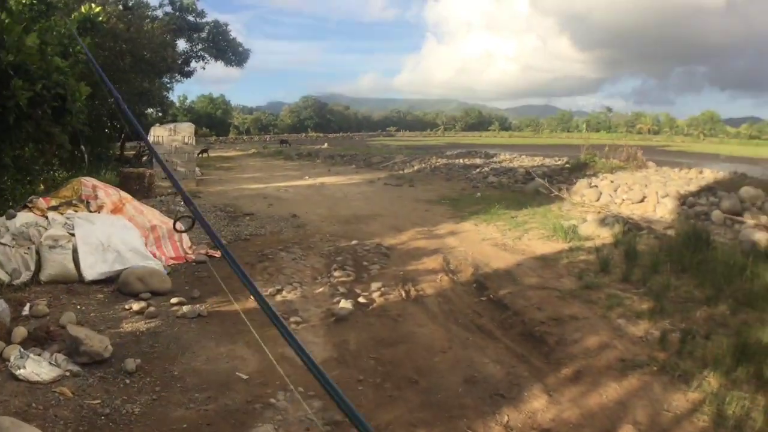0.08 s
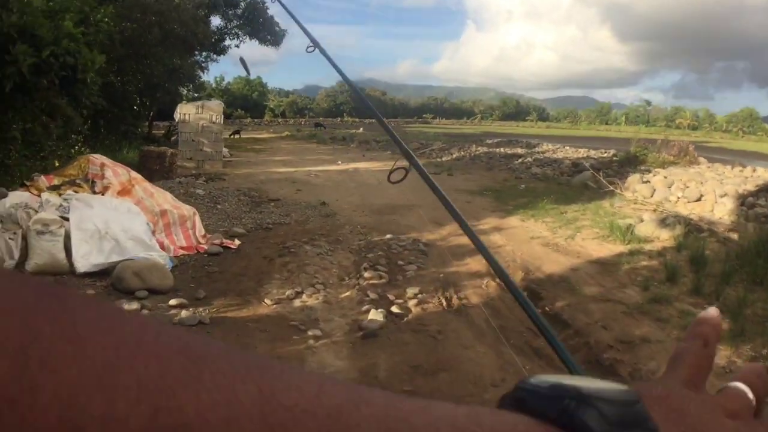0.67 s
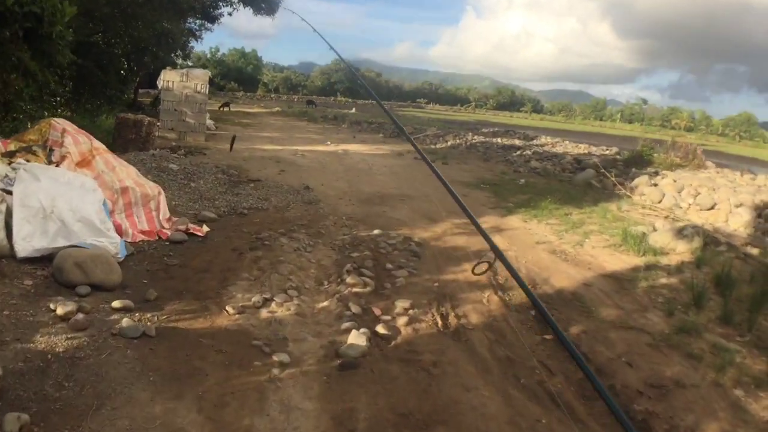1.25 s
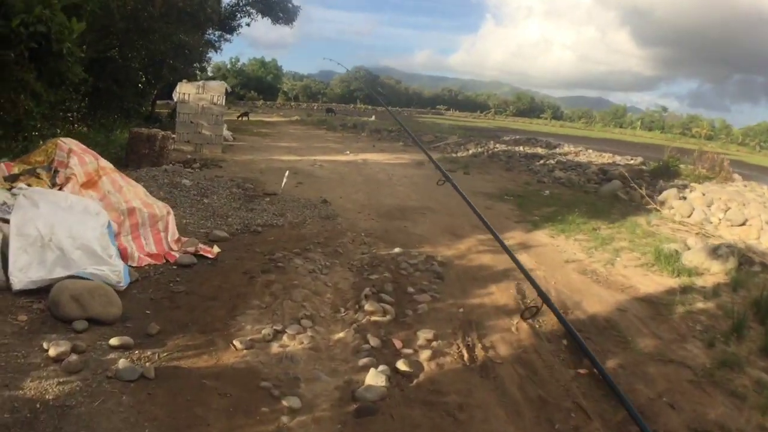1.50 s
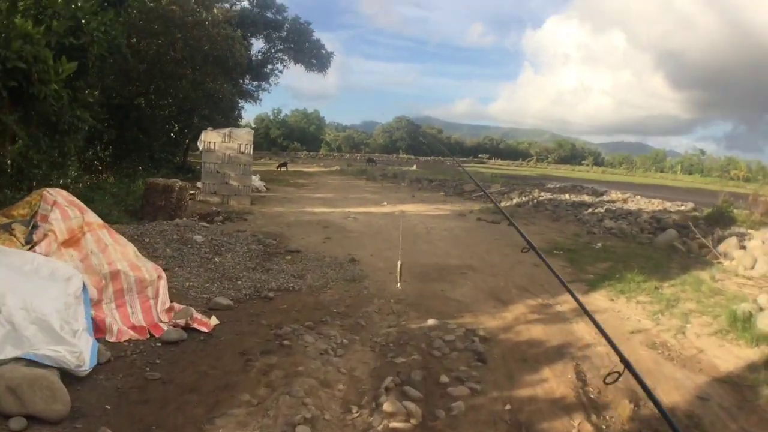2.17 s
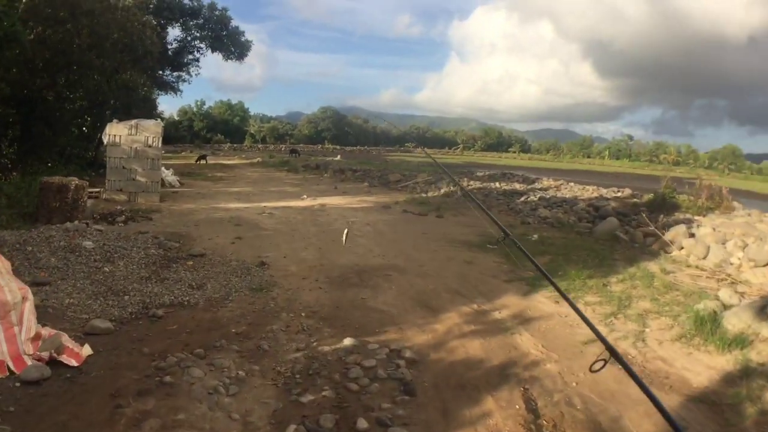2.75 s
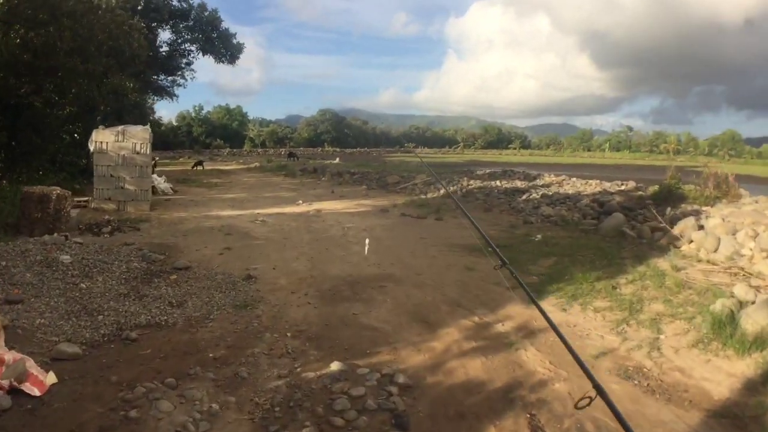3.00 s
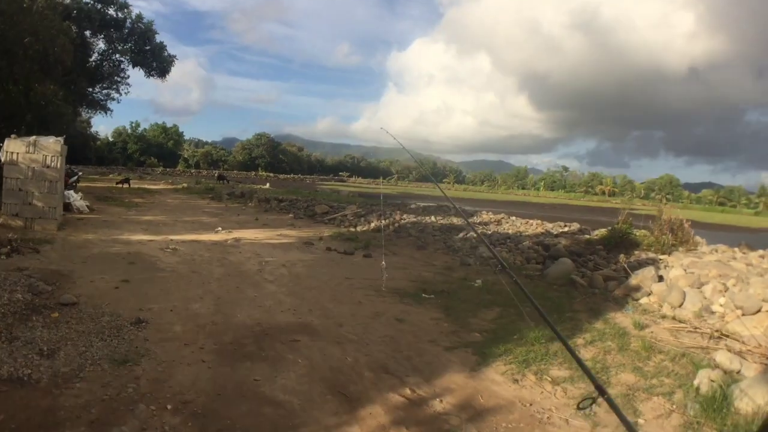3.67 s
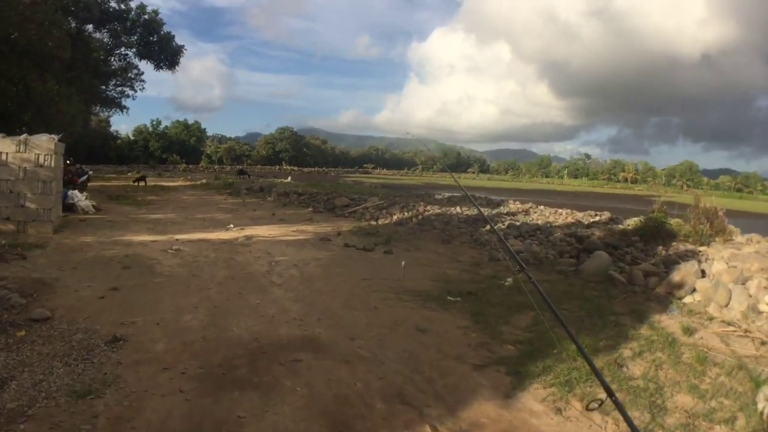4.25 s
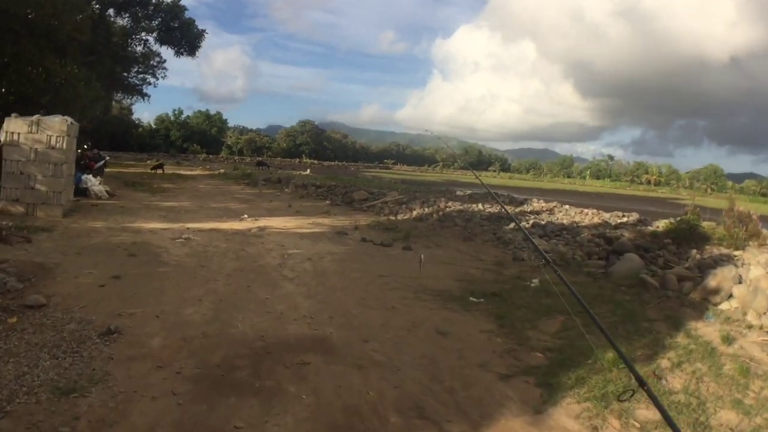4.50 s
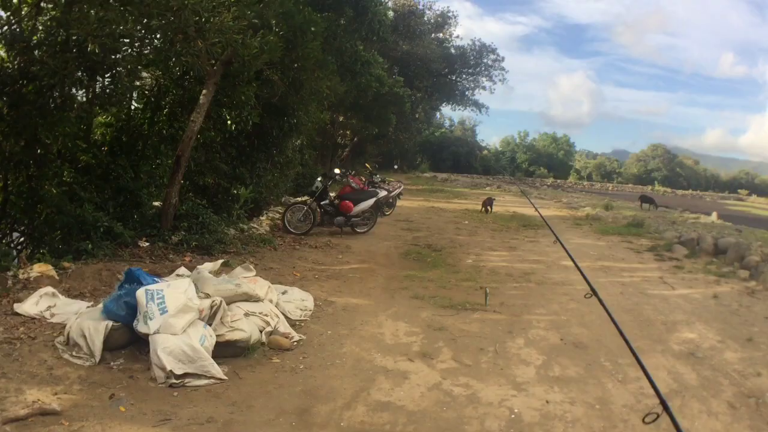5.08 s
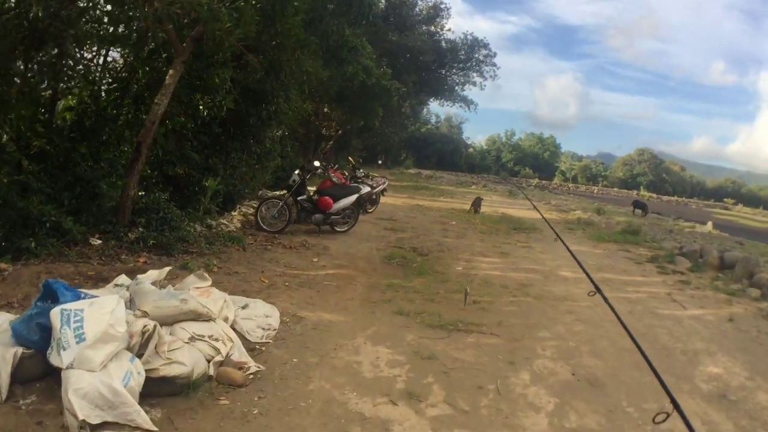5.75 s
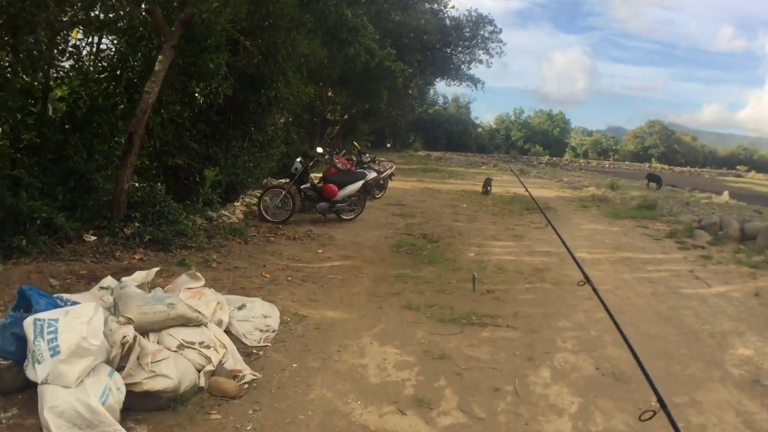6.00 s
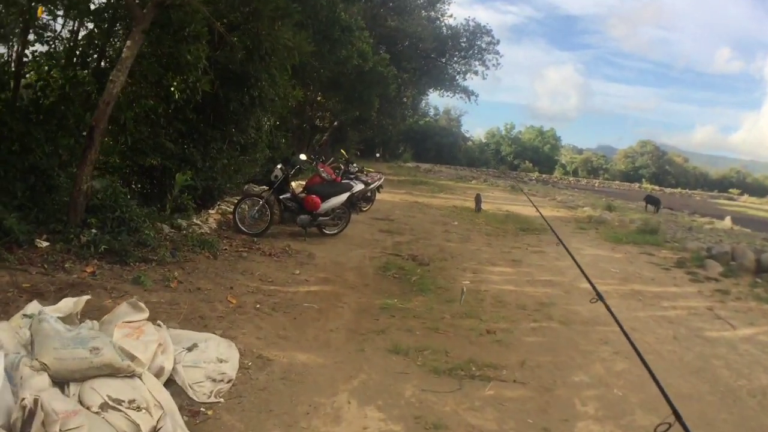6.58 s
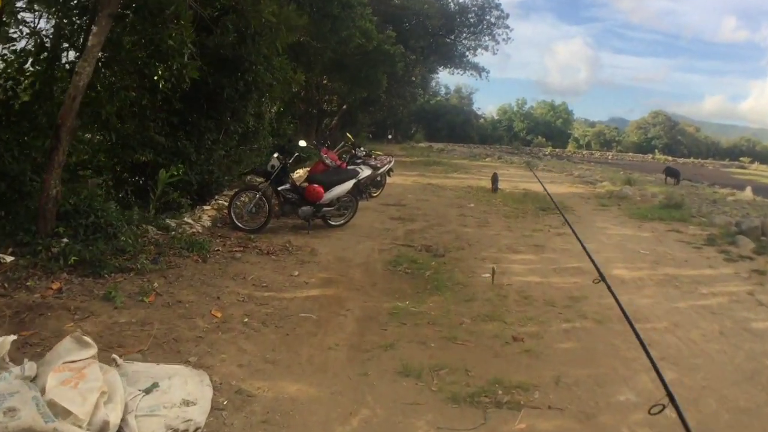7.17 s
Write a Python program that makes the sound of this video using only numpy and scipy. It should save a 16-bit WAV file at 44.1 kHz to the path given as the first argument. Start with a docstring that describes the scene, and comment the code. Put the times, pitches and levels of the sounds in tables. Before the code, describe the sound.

Cloth scrapes and rumbles right on the microphone as gear and fingers knock loudly against its case, during a walk outdoors.

```python
"""Walking with rod and camera

Someone walks a dirt path with a fishing rod, a small camera held against the body. Each stride jolts
it: cloth grabs, holds and lets go as it scrapes the case, and gear and fingers knock on it, so close
to the microphone inside that the input overloads. Behind this lie quiet open air, a faint insect
in the grass and a thin whistle far off."""
import sys
import numpy as np
from scipy import signal
from scipy.fft import rfft, irfft
from scipy.io import wavfile
from scipy.ndimage import uniform_filter1d

SR = 44100
rng = np.random.default_rng(int(sys.argv[2]) if len(sys.argv) > 2 else 0)


def pcm_store(signal):
    """Save signal as 16-bit PCM."""
    levels = np.round(np.clip(np.atleast_2d(signal), -1, 1) * 32767)
    wavfile.write(sys.argv[1], SR, levels.astype(np.int16).T)


N = 324135


def amp(db):
    """Decibels to gain."""
    return 10 ** (np.asarray(db) / 20)


def unit_rms(x):
    """Scales to rms 1."""
    return x / np.sqrt(np.mean(x ** 2) + 1e-20)


def curve_db(points, hz):
    """Reads a spectrum on a log-frequency axis."""
    point_hz, db = np.transpose(points)
    return np.interp(np.log(hz + 1), np.log(point_hz), db)


def add(mix, start_s, sound):
    """Adds a sound to the mix in place."""
    part = mix[max(round(start_s * SR), 0):][:len(sound)]
    part += sound[:len(part)]


def below(hz, corner_hz, order=4):
    """Gain of a smooth low-pass; swapping the two frequencies makes it a high-pass."""
    return 1 / np.sqrt(1 + (hz / corner_hz) ** (2 * order))


def minimum_phase(gain):
    """Spectrum with this gain curve that starts sharply and rings after."""
    cepstrum = irfft(np.log(gain + 1e-9))
    half = len(cepstrum) // 2
    cepstrum[1:half] *= 2
    cepstrum[half + 1:] = 0
    return np.exp(rfft(cepstrum))


def flutter(size=1000):
    """Random wandering of rms 1, smoothed over size samples."""
    return unit_rms(signal.oaconvolve(rng.standard_normal(N), np.hanning(size), "same"))


def swell(middle_s, length_s):
    """A bell-shaped rise and fall."""
    return np.exp(-(2 * (np.arange(N) / SR - middle_s) / length_s) ** 2)


# The air all around the path, with microphone hiss. Each row: frequency in Hz, relative level in dB.
AIR_SPECTRUM = [(20, -5), (60, 4), (200, -6), (600, -11), (1200, -15), (2300, -29), (3500, -28),
                (6000, -33.5), (10000, -37.5), (15000, -42)]


def air(level_db=-54):
    """Steady quiet wash of the open valley."""
    hz = np.fft.rfftfreq(N, 1 / SR)
    wash = irfft(rfft(rng.standard_normal(N)) * amp(curve_db(AIR_SPECTRUM, hz)), N)
    return amp(level_db) * unit_rms(wash)


# Modes of the case around the microphone. Each row: frequency in Hz, width in Hz, level in dB.
CASE_MODES = [(82, 39.7, -5.5), (121.3, 36, -3), (161.3, 29.4, -0.5), (307, 163, -10.5), (604, 62.8, -1.5),
              (736, 87, -2.5), (1110, 40, -15.5), (1911, 47, -16), (2289, 108, -10), (2723, 110, -18),
              (3250, 80, -15.5), (4460, 250, -33), (5500, 160, -19.5), (7100, 1400, -33),
              (12200, 1500, -42.5)]


def case_gain(hz, mode_db=0, detune=1, bass_cut_hz=45):
    """A scrape or knock reaches the microphone through the case modes; mode_db favours some."""
    mode_hz, width_hz, db = np.transpose(CASE_MODES)[:, :, None]
    off_resonance = (hz ** 2 - (mode_hz * detune) ** 2) / (hz * width_hz)
    power = amp(db + mode_db) ** 2 / (1 + off_resonance ** 2)
    return np.sqrt(power.sum(0)) * below(bass_cut_hz, hz, order=2)


def slips(per_s=4500, uneven_db=3, clump_db=2.0):
    """Tiny stick-slip snaps of uneven size that come in clumps."""
    sizes = rng.standard_normal(N) * amp(uneven_db * np.minimum(rng.exponential(1, N), 4))
    snaps = rng.random(N) < per_s / SR
    return snaps * sizes * amp(clump_db * flutter(size=400))


# Strokes of cloth right on the camera. Each row: time of full contact in seconds, hold in seconds,
# pressure in dB, then rumble and grit as offsets from it in dB.
CLOTH_STROKES = [(.01, 0.14, -41, 4.5, -15.5), (.26, .07, -36, 7, -16), (.39, 0.051, -38, 11, -12.5),
                 (.49, .03, -42, 5, -13.5), (.59, 0.091, -40.5, 9.5, -11), (.76, 0.18, -40.5, 14.5, -10),
                 (.93, .08, -30.5, 16, -11.5), (1.099, 0.13, -44, 2, -10.5),
                 (1.283, 0.07, -34.5, 10, -10.5), (1.466, 0.039, -28.5, 7, -16),
                 (1.662, 0.024, -31.5, 9, -13.5), (1.742, 0.043, -25, -1, -16.5),
                 (1.83, 0.029, -30, 7, -12.5), (1.91, 0.03, -29, 4, -13.5), (1.971, .1, -21.5, 9.5, -9.5),
                 (2.099, 0.072, -17.5, 3, -15), (2.199, 0.031, -32, 15, -8.5),
                 (2.348, 0.022, -29.5, 6.5, -10.5), (2.42, 0.068, -40, 15.5, -10.5),
                 (2.593, 0.064, -20.5, -1, -13), (2.69, 0.068, -28.5, 3, -14),
                 (2.8, 0.061, -34.5, 8.5, -15.5), (2.92, 0.1, -38.5, 7, -15), (3.045, 0.022, -26, 3, -15.5),
                 (3.146, 0.046, -28.5, 5, -13.5), (3.273, 0.069, -30, 4, -14),
                 (3.43, 0.018, -42.5, 3.5, -19), (3.52, 0.038, -37, 3, -14), (3.628, 0.04, -22.5, -2, -11),
                 (3.716, 0.051, -26, -1, -11), (3.801, 0.07, -32.5, 6.5, -8.5),
                 (3.985, 0.013, -30.5, 8, -14), (4.074, 0.026, -26.5, 6.5, -13),
                 (4.151, 0.18, -32, -2.5, -13.5), (4.268, 0.07, -30.5, 5, -6.5),
                 (4.44, .22, -36, -2.5, -24), (4.77, 0.036, -30, -2.5, -26),
                 (4.842, 0.032, -24.5, 4, -11.5), (5.071, 0.03, -33.5, 2.5, -13),
                 (5.205, 0.012, -39, 5, -8), (5.28, 0.053, -42.5, 13.5, -11),
                 (5.41, 0.074, -47.5, 9, -11.5), (5.521, 0.034, -35.5, 1, -10.5),
                 (5.638, 0.1, -37, 3, -19.5), (5.8, 0.035, -44, 7, -13), (5.99, .02, -37.5, 6.5, -22),
                 (6.08, .12, -37, 2.5, -13), (6.23, .12, -43, 2, -9.5), (6.42, .05, -46.5, 10, -15),
                 (6.54, 0.087, -51, 6.5, -13), (6.66, 0.13, -44, 3.5, -19), (7.092, 0.029, -41.5, 12, -9),
                 (7.19, 0.079, -42.5, 2.5, -13), (7.31, .04, -36.5, 4, -14.5)]


def cloth_contact(grab_db_per_s=376.5, let_go_db_per_s=528):
    """Pressure, rumble and grit in dB over time: every stroke grabs, holds and lets go by one rule."""
    def powers(db, rumble_db, grit_db):
        return amp([[db], [db + rumble_db], [db + grit_db]]) ** 2

    t = np.arange(N) / SR
    power = powers(db=-53, rumble_db=10.4, grit_db=-13) * np.ones(N)  # the cloth never quite leaves
    for start, hold, db, rumble_db, grit_db in CLOTH_STROKES:
        near = slice(*np.searchsorted(t, [start - .5, start + hold + .5]))
        grab_db = grab_db_per_s * (t[near] - start)
        let_go_db = let_go_db_per_s * (start + hold - t[near])
        shape_db = np.minimum(0, np.minimum(grab_db, let_go_db))
        power[:, near] += powers(db, rumble_db, grit_db) * amp(shape_db) ** 2
    return 10 * np.log10(power)


# The force of cloth dragging on the case. Each row: frequency in Hz, relative level in dB.
FRICTION_SPECTRUM = [(25, 0), (45, 22.5), (80, 16), (150, 3), (300, 7), (600, 11.5), (1100, 3.5),
                     (2200, -0.5), (2800, -3), (3400, -18.5), (4600, -18), (5600, -33), (9000, -40.5),
                     (15000, -37)]
# Sharp peaks and gaps heard from inside when scraping spreads over the shell.
# Each row: frequency in Hz, width in Hz, boost or cut in dB.
SHELL_COLOUR = [(486, 86, 9), (956, 57, 7.5), (1275, 190, 1), (1457, 100, 4.5), (1550, 130, -5.5),
                (2860, 200, 4), (3110, 170, -11), (4230, 320, -17.5), (4620, 130, 6), (4940, 670, -11),
                (5650, 200, -2.5), (6020, 290, -6), (7140, 1200, 3.5), (8500, 690, -4), (11400, 1500, 4.5)]


def scraping(rumble_hz=300, grit_hz=1400, fizz_hz=4000, firm_db=-42, fizz_growth=1.46, catch_db=1.6):
    """Slips of cloth pass through the case modes; firmer scraping brings out the top."""
    hz = np.fft.rfftfreq(N, 1 / SR) + 1
    pressure_db, rumble_db, grit_db = cloth_contact()
    fizz_db = firm_db + fizz_growth * (grit_db - firm_db)
    shell_db = sum(db * np.exp(-2 * ((hz - centre) / width) ** 2) for centre, width, db in SHELL_COLOUR)
    colour = case_gain(hz) * amp(curve_db(FRICTION_SPECTRUM, hz) + shell_db)
    scrape = rfft(slips()) * minimum_phase(colour)
    bands = [(below(hz, rumble_hz), rumble_db - 2),
             (below(rumble_hz, hz) * below(hz, grit_hz), pressure_db - 3.3),
             (below(grit_hz, hz) * below(hz, fizz_hz), grit_db),
             (below(fizz_hz, hz, order=8), fizz_db - 14)]
    # each band catches and lets go a little on its own
    return sum(amp(db + catch_db * flutter()) * unit_rms(irfft(scrape * band, N)) for band, db in bands)


# Gear and fingers striking the case, right at the microphone. Each row: start in seconds, force in dB,
# contact corner in Hz (soft is low), extra thump in dB, extra hollow ring in dB.
CASE_KNOCKS = [(0.0446, 49, 316, -6, -1), (0.1347, 47, 550, -6, -5), (0.253, 42.5, 230.0, -8, -2),
               (0.2672, 7, 1940.0, 27.5, 12), (0.3869, 45, 990, -3, -0.5), (0.7609, 27, 685, -2.0, 6.5),
               (0.8117, 43.5, 640, -4, 3.5), (0.8467, 40.5, 2400, -35, -42), (0.8998, 44.5, 590, -3.5, 9.5),
               (0.92, 46, 604, -2, 1.5), (1.004, 31, 1560, 4, 15.5), (1.066, 21, 730.0, 16.5, -10),
               (1.1452, 46, 254, -4, -2), (1.2599, 46, 510, -5, -7.5), (1.3302, 24, 1510, 4.5, 6),
               (1.4424, 44.5, 940, -3.5, -8), (1.644, 23, 900.0, 9.5, -6), (1.6521, 8, 1520, 27, 10),
               (1.778, 44, 780, -7.5, -3.5), (1.8387, 24, 2430, 11, 4.5), (1.9424, 29, 970, 19, 9),
               (1.9678, 37.5, 2110, 5, 8), (2.03, 41.5, 388, 1.5, 11), (2.091, 32.5, 1280.0, 5.5, 18.5),
               (2.1019, 42.5, 1550, 0.5, -10), (2.134, 37.5, 700, -1, 10.5), (2.1839, 36, 310, 9.5, 4),
               (2.249, 39.5, 298, 5, -16), (2.3609, 23.5, 600, 1, 8), (2.4244, 43.5, 1170, -4, 8.5),
               (2.4642, 42, 605, -13, 11), (2.6238, 26, 1470.0, 6.5, 11), (2.82, 40, 1090, -4, 9),
               (2.976, 36, 1900, -45, 13), (3.0838, 18, 260.0, 14, 28), (3.2477, 19, 1810, 2, 2),
               (3.275, 24, 1490, 10, 9), (3.2929, 36.5, 300.0, 0.5, 4), (3.534, 42, 2550, -6, 15.5),
               (3.6726, 9, 600.0, 31.5, -13), (3.7517, 33.5, 3260, 1, -3), (3.769, 43, 6500, -5, 8),
               (3.8887, 27, 260.0, 8.5, 15), (3.9817, 42, 530, -5, 1.5), (4.083, 33, 1760, -7, 13.5),
               (4.185, 38.5, 3640, 7, 7), (4.2665, 41.5, 1250, -3.5, 7.5), (4.283, 39, 850.0, -9, -2),
               (4.3687, 27.5, 1430, 10.5, 7.5), (4.4225, 48, 240.0, -14, -3), (4.448, 32.5, 220.0, 3, 9.5),
               (4.6164, 46, 597, -1.5, -4), (4.632, 45.5, 340.0, -20.5, 1), (4.6476, 34, 322, 5.5, 12.5),
               (5.0513, 42.5, 890, -7.5, 0.0), (5.2427, 16.5, 3630.0, 17.5, -20), (5.313, 28, 3080, 13, 9),
               (5.3328, 48.5, 555, -8.5, -12), (5.4332, 40, 637, 2.5, -1), (5.5429, 27, 910, 11, 8),
               (5.6936, 43.5, 530, -13.5, -41), (5.7001, 45.5, 553, -15, -6), (5.773, 14, 500, 8.5, 10),
               (5.8248, 42, 1180, -1.5, -3.5), (5.996, 36, 393, -0.5, -5), (6.1794, 43.5, 1180, 0, -3.5),
               (6.357, 31, 515, 2.5, -14), (6.4452, 48.5, 370, -7.5, -4), (6.5393, 34, 290.0, -2.5, 5.5),
               (6.5526, 39.5, 111, 0, 0), (6.654, 21.5, 390.0, 9, -2), (6.7538, 12.5, 750.0, 11, 10.5),
               (6.8417, 8, 177, 17.5, -3), (7.1082, 42, 3770.0, -4, -19), (7.186, 4, 1720, 26.5, -30),
               (7.3024, 43, 1010, -2, -5.5)]


def knocks(thump_hz=260, hollow_hz=410, hollow_width_hz=80, place_hz=900, padding_hz=1900, size=4096):
    """Each blow rings the case; the treble arrives first and the bass last, so it falls like a 'tock'."""
    hz = np.fft.rfftfreq(size, 1 / SR) + 1
    lag_at_100_hz_s = 0.00645  # bending waves are slower the lower they are
    bending = np.exp(-4j * np.pi * lag_at_100_hz_s * np.sqrt(100 * hz))
    thump = below(hz, thump_hz, order=2) ** 2
    hollow = below(hz - hollow_hz, hollow_width_hz, order=1) ** 2
    # the place of the blow decides which of the upper modes speak
    upper_modes = below(place_hz, np.transpose(CASE_MODES)[0])
    places_db = rng.uniform(-6, 5, (len(CASE_KNOCKS), len(CASE_MODES))) * upper_modes
    # the grip changes from blow to blow and detunes each mode a little
    grips = rng.uniform(.95, 1.05, (len(CASE_KNOCKS), len(CASE_MODES), 1))
    out = np.zeros(N)
    for (start, db, contact_hz, thump_db, hollow_db), place_db, grip in zip(CASE_KNOCKS, places_db, grips):
        force = amp(db + thump_db * thump + hollow_db * hollow)
        force *= below(hz, contact_hz, order=1) ** 2  # a softer contact leaves the high modes still
        force *= below(hz, contact_hz + padding_hz, order=2)  # skin and cloth round off the very start
        ring = minimum_phase(case_gain(hz, place_db[:, None], grip) * force)
        add(out, start, irfft(ring * bending)[:size // 2])
    return out


# Close rasps from the shell. Each row: middle in seconds, length in seconds, pitch in Hz, level in dB.
SHELL_RASPS = [(.29, 0.055, 3420, -60), (1.31, 0.037, 3450, -48.5), (1.31, .045, 5470, -62),
               (1.486, 0.055, 3460, -48), (1.49, .05, 5460, -62), (1.49, .05, 7140, -67),
               (1.672, 0.027, 3500, -53), (1.753, 0.027, 3500, -45), (1.753, 0.024, 7140, -66),
               (1.844, 0.028, 7140, -60), (2.023, 0.064, 3430, -32.5), (2.09, 0.16, 7300, -47),
               (2.675, 0.1, 4470, -54.5), (3.17, 0.067, 4500, -66), (3.282, 0.026, 4580, -52),
               (4.32, 0.084, 4570, -54), (4.86, 0.062, 7030, -63)]


def rasps(width_hz=190):
    """A firm drag sets one narrow shell mode singing, driven by slips while it lasts."""
    hz = np.fft.rfftfreq(N, 1 / SR)
    drive = rfft(slips())
    out = np.zeros(N)
    for middle, length, mode_hz, db in SHELL_RASPS:
        singing = irfft(drive * below(hz - mode_hz, width_hz, order=2), N)
        out += amp(db) * swell(middle, length) * unit_rms(singing)
    return out


# An insect, faint in the grass. Each row: middle in seconds, length in seconds, level in dB.
INSECT_BUZZES = [(.71, .14, -73), (1.383, .09, -66), (1.6, .09, -70), (1.876, .12, -72), (3.02, .12, -78),
                 (5.25, .08, -77), (5.494, .1, -83)]


def insect(pitch_hz=12450, width_hz=280):
    """Short flickering swells of a narrow, very high buzz."""
    hz = np.fft.rfftfreq(N, 1 / SR)
    buzz = irfft(rfft(rng.standard_normal(N)) * below(hz - pitch_hz, width_hz, order=2), N)
    flicker = amp(3 * flutter() - 1.5)
    swells = sum(amp(db) * swell(middle, length) for middle, length, db in INSECT_BUZZES)
    return unit_rms(buzz) * flicker * swells


# Tackle tapping the case, right at the microphone.
# Each row: start in seconds, gain in dB, extra gain for the ping in dB.
TACKLE_TICKS = [(0.8476, -13, -1), (1.0085, -14, -14.5), (1.089, -42, 1), (2.9772, -13, -11),
                (3.2511, -25, -14), (3.769, -0.5, -17), (3.971, -24, -15), (4.0835, -15, -13),
                (4.372, -29.5, 5), (4.4235, -54, -12), (4.872, -18, -6), (5.2453, -25.5, -7),
                (5.309, -17.5, -1.5), (5.3204, -41, 6), (5.4337, -20, -27), (7.1093, -10.5, -2)]
# The low clack and high ping in a tick. Each row: frequency in Hz, seconds to fall 60 dB, level in dB.
CLACK_MODES = [(744, 0.017, 9), (1300, 0.017, -0.5), (1990, 0.016, -1), (2350, 0.012, 2)]
PING_MODES = [(3740, 0.013, -7.5), (5340, 0.0081, -1), (5620, 0.013, -8), (6850, 0.0072, -9.5)]


def ticks(rise_s=0.00086, detune=0.041, size=1500):
    """Small hard contacts: a short plastic clack with a ping on top."""
    def ring(modes, shift):
        return sum(amp(db - 60 * t / t60) * np.sin(2 * np.pi * hz * shift * t) for hz, t60, db in modes)

    t = np.arange(size) / SR
    attack = 1 - np.exp(-t / rise_s)
    shifts = 1 + detune * rng.uniform(-1, 1, len(TACKLE_TICKS))
    out = np.zeros(N)
    for (start, db, ping_db), shift in zip(TACKLE_TICKS, shifts):
        tick = ring(CLACK_MODES, shift) + amp(ping_db) * ring(PING_MODES, shift)
        add(out, start, amp(db) * tick * attack)
    return out


# One whistle, far from the path. Each row: time in seconds, pitch in Hz, level in dB.
WHISTLE_CONTOUR = [(4.33, 1630, -70), (4.42, 1580, -57), (4.549, 1604, -54.5), (4.679, 1530, -63),
                   (4.8, 1530, -64), (4.86, 1500, -75)]


def whistle(waver=0.005):
    """A thin distant tone that wavers and sinks slowly."""
    times, hz, db = np.transpose(WHISTLE_CONTOUR)
    t = np.arange(N) / SR
    wobble = unit_rms(uniform_filter1d(rng.standard_normal(N), size=400))
    pitch_hz = np.interp(t, times, hz) * (1 + waver * wobble)
    level = np.interp(t, times, amp(db), left=0, right=0)
    return np.sqrt(2) * level * np.sin(2 * np.pi * np.cumsum(pitch_hz) / SR)


def scene():
    """Close handling over the quiet outdoors, at one microphone; nothing reflects."""
    handling = knocks() + ticks() + scraping() + rasps()
    return (handling + air() + whistle() + insect())[None]


def record(dry, overload=.71, band_edge_hz=15600):
    """The camera's input clips hard knocks flat, then cuts off the highest treble."""
    clipped = np.clip(dry, -overload, overload)
    low_pass = signal.firwin(255, band_edge_hz, window=("kaiser", 8), fs=SR)
    return signal.oaconvolve(clipped, low_pass[None], "same")


dry = scene()
out = record(dry)
pcm_store(out)
```